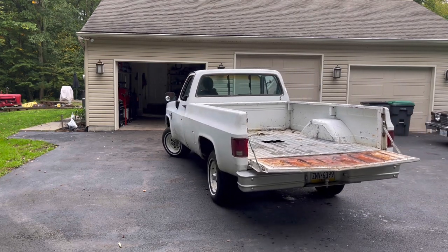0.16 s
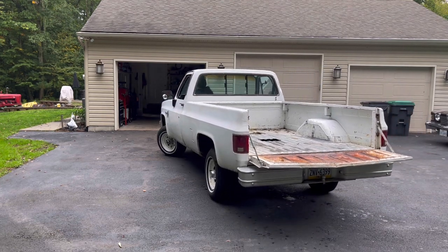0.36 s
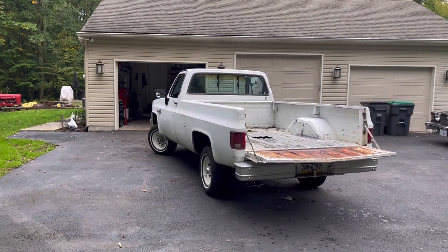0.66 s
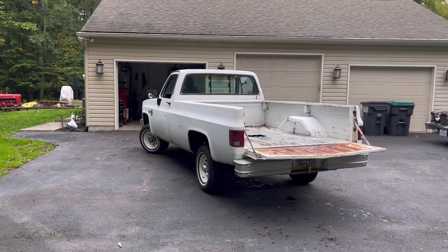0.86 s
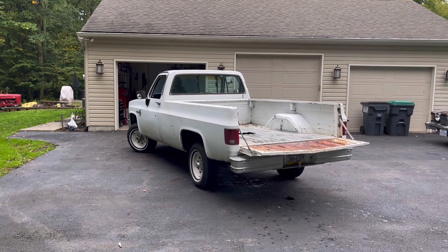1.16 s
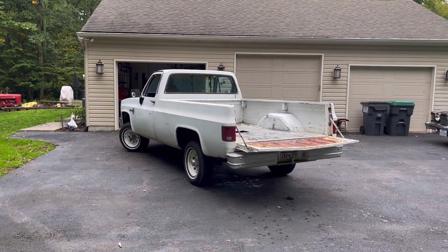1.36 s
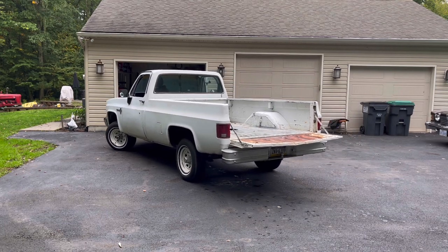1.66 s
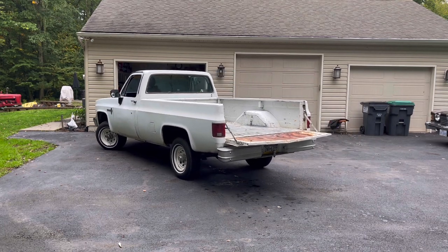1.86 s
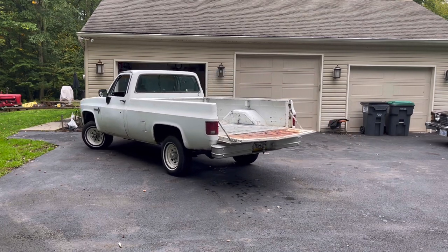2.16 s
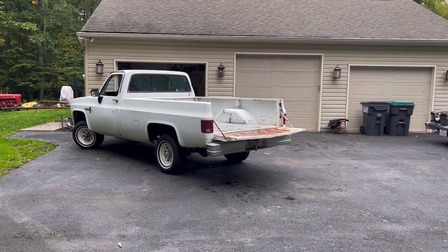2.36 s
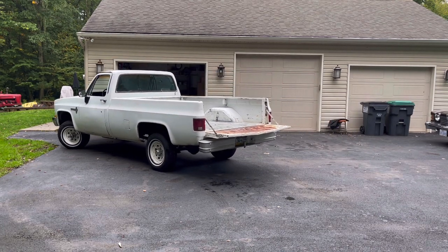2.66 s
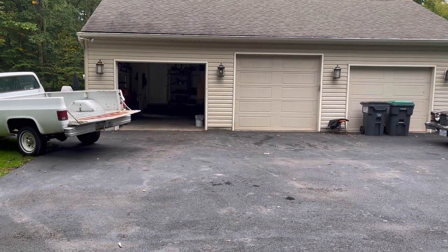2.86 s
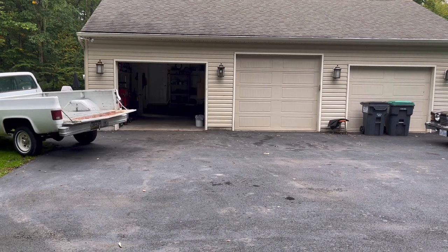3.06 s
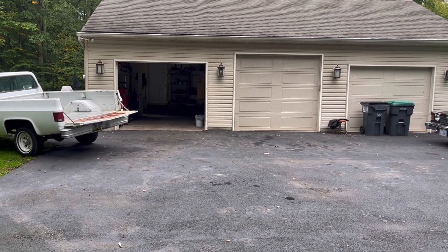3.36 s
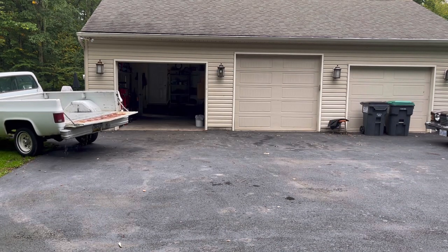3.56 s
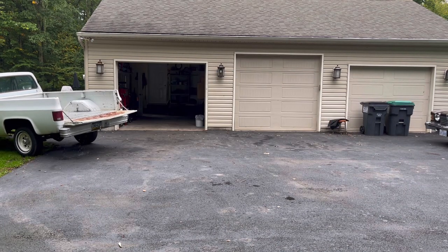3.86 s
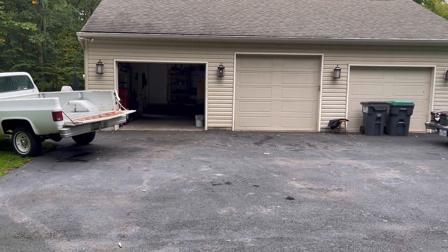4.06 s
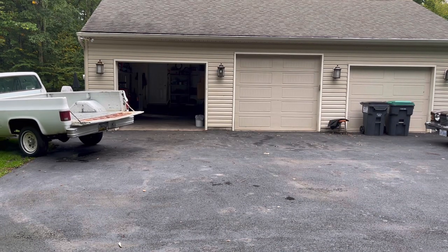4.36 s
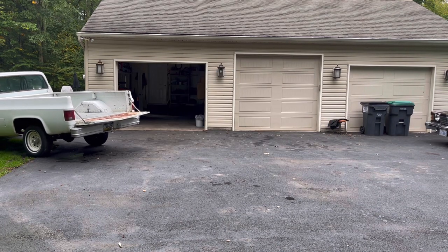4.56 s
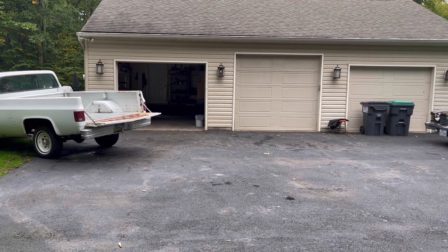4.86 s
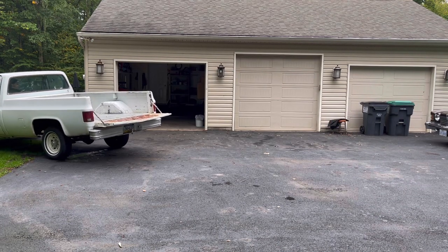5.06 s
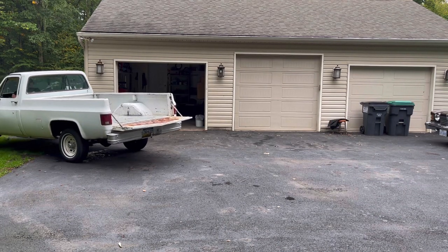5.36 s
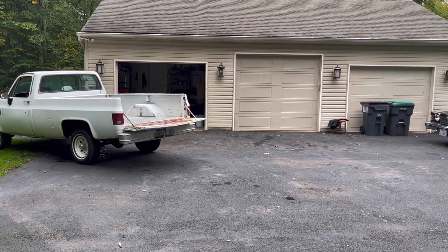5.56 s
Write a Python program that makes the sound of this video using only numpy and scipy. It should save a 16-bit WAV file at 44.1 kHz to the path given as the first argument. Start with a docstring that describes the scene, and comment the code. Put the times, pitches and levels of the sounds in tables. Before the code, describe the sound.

Deep exhaust chugging and chirping tyres on asphalt, an uneven faltering middle stretch, then a sudden louder, quicker engine drone with rubber squeaks and clunks.

```python
"""An old six-cylinder pickup manoeuvres on a sealed driveway, in three stretches joined abruptly.
First the exhaust throbs as firing pulses ring pipe and shell, tyres scrub, insects hiss faintly, and
stick-slip squeals return from ground and wall. Then weakened firings, short squeaks, a loose knock and
cracking grit are heard. Last the engine fires faster with louder squeaks, and slows past more knocks,
a brief bright hiss and two snaps of grit."""
import sys
import numpy as np
from scipy import signal
from scipy.fft import rfft, irfft
from scipy.io import wavfile
from scipy.ndimage import uniform_filter1d

SR = 44100
rng = np.random.default_rng(int(sys.argv[2]) if len(sys.argv) > 2 else 0)


def boost(x):
    """Linear amplitude factor 10**(x/20) for a level x in decibels (scalar or array-like)."""
    u = np.asarray(x, float) / 20
    return 10 ** u


def waveform_to_disk(signal):
    """Save audio, clipped to [-1, 1], as 16-bit WAV at the path in sys.argv[1]."""
    frames = np.transpose(np.atleast_2d(signal))
    scaled = np.clip(frames, -1, 1) * 32767
    samples = np.round(scaled).astype(np.int16)
    wavfile.write(sys.argv[1], SR, samples)


N = 251370

# the three stretches: (start [s], end [s])
STRETCHES = [(0, 2.7), (2.7, 4.073), (4.073, 5.7)]
# engine loudness as heard, one table a stretch, with a brief drop after the loud squeak of the third:
# (time [s], exhaust level [dB], body shake level [dB])
ENGINE_LOUDNESS = [
    [(0, -29, -29), (.08, -29.5, -32), (.18, -23.5, -21), (.9, -24, -22.5), (1.35, -23, -20.5),
     (1.7, -26.5, -23), (2.27, -23, -21), (2.5, -26.5, -20), (2.7, -26, -21.5)],
    [(2.7, -24, -27), (3.75, -25, -28), (3.83, -24, -27.5), (4.07, -22.5, -31)],
    [(4.076, -13, -33), (4.264, -14, -29), (4.36, -22, -38), (4.436, -21, -28), (4.522, -15.5, -24),
     (4.808, -13.5, -30), (5.034, -14, -16), (5.07, -17, -27), (5.19, -17.5, -23), (5.29, -24.5, -16),
     (5.6, -22.5, -19.5), (5.7, -27.5, -20)],
]
# how far left the pickup is heard, one value a stretch: (scale factor of the left-right level difference)
LEFTWARD = [0.19, 0.64, 0.55]


def evened(x):
    """Normalises the mean power: scales to rms 1."""
    return x / np.sqrt(np.mean(x ** 2) + 1e-20)


def read(points, hz):
    """Interpolates a spectrum on a logarithmic frequency axis."""
    f, value = np.transpose(points)
    return np.interp(np.log(hz + 1), np.log(f + 1), value)


def columns(rows, t):
    """Interpolates each column of a time table linearly."""
    s, *rest = np.transpose(rows)
    return [np.interp(t, s, c) for c in rest]


def by_stretch(values, t):
    """Piecewise-constant function of time: one value for each stretch."""
    return np.asarray(values)[np.searchsorted([a for a, b in STRETCHES[1:]], t)]


def drift(length):
    """Low-pass random process: white noise twice averaged over length samples, at rms 1."""
    return evened(uniform_filter1d(uniform_filter1d(rng.standard_normal(N), length), length))


def bursts(rows, rise, fall, t):
    """Power sum of envelopes that climb, hold and decay exponentially (slopes in dB per s)."""
    power = 0
    for s, hold, peak_db in rows:
        before_db = np.maximum(rise * (s - t), 0)
        after_db = np.maximum(fall * (t - s - hold), 0)
        power = power + boost(2 * (peak_db - before_db - after_db))
    return np.sqrt(power)


def noise(spectra, level_db, patchy_db, flicker_db):
    """Partially coherent noise at two microphone ports, made from random short-time spectra."""
    # likeness of the two ports: (frequency [Hz], correlation [0-1])
    likeness = [(60, 1), (300, .98), (600, .9), (2000, .8), (4000, .88), (15000, .93)]
    # phase by which the left port leads: (frequency [Hz], lead [rad])
    phase_lead = [(0, 0), (780, 0.5), (1380, 0.5), (2760, 2.1), (3100, 1.7), (3790, -0.0), (6800, 0.3),
                  (7750, 1.0), (8870, -0.3), (9730, -2.7), (10900, -3.7), (11500, -6.3), (12600, -6.4),
                  (15200, -6.3)]
    # left-right level difference before scaling by LEFTWARD: (frequency [Hz], difference [dB])
    left_excess = [(60, 9), (150, 11), (380, 4.5), (950, 10), (2380, 14.5), (5980, 7.5), (15000, -7)]
    frames, hz = N // 128 + 5, np.fft.rfftfreq(512, 1 / SR)
    t = np.arange(frames) * 128 / SR
    a, b, c, d, patches = rng.standard_normal((frames, 257, 5)).T
    patches = evened(uniform_filter1d(uniform_filter1d(patches, 6, 0), 12, 1))  # over frequency, then time
    flicker = evened(uniform_filter1d(rng.standard_normal(frames), 3))  # all frequencies together
    same = np.clip(read(likeness, hz), -1, 1)[:, None]
    left = a + 1j * b
    right = same * left + np.sqrt(1 - same ** 2) * (c + 1j * d)
    right = right * np.exp(-1j * read(phase_lead, hz))[:, None]
    lean_db = read(left_excess, hz)[:, None] * by_stretch(LEFTWARD, t) / 2
    z = np.array([left * boost(lean_db), right * boost(-lean_db)])
    colours = np.array([boost(read(points, hz)) for points in spectra])
    colours /= np.linalg.norm(colours, axis=1, keepdims=True)
    z *= by_stretch(colours, t - 256 / SR).T * boost(patchy_db * patches + flicker_db * flicker)
    return boost(level_db) * evened(signal.istft(z, nperseg=512, noverlap=384)[1][:, :N])


def shell(modes):
    """Modal impulse response of the muffler shell: damped sines, each with its own rise time."""
    t = np.arange(6000) / SR
    ring = np.zeros(len(t))
    for hz, width, db, rise in modes:
        envelope = (1 - np.exp(-(t / rise) ** 2)) * np.exp(-np.pi * width * t)
        ring += boost(db) * envelope * np.sin(2 * np.pi * hz * t)
    return ring


def response(points, lag, size=16384):
    """Centred pulse by the Hilbert gain-phase relation: lag 1 is minimum phase, lag 0 symmetric."""
    log_gain = signal.hilbert(np.log(boost(read(points, abs(np.fft.fftfreq(size, 1 / SR))))))
    return np.fft.fftshift(np.fft.ifft(np.exp(log_gain.real - 1j * lag * log_gain.imag)).real)


def exhaust():
    """Source-filter principle: a train of negative pressure pulses, one a firing, rings pipe and shell."""
    # firing rate in each stretch: (time [s], rate [firings per s])
    first_rates, second_rates, third_rates = [(0.0, 24.2), (0.14, 25.9), (0.32, 34.2), (0.41, 33.1),
                                              (0.65, 29.0), (0.82, 27.4), (1.05, 33.7), (1.3, 38.2),
                                              (1.71, 34.8), (2.2, 38.5), (2.55, 34.7), (2.7, 35.6)], [(2.7, 38.2), (2.874, 40.2), (3.508, 40.9),
                                                              (3.902, 42.7), (4.07, 42.0)], [(4.076, 80.2), (5.012, 80.2),
                                                                               (5.148, 78.3), (5.27, 73.2),
                                                                               (5.374, 71.2), (5.58, 69.7),
                                                                               (5.7, 63.2)]
    # strength of each cylinder in firing order: (level [dB])
    cylinder_levels = [.5, -.5, 0, .4, -.6, .2]
    # random spread of firing strength, one value a stretch: (spread [dB])
    strength_spread = [.7, .6, .4]
    # random spread of firing time, one value a stretch: (spread [share of the gap between firings])
    timing_spread = [.012, .01, .008]
    # brief weakening of the firings: (middle [s], level change [dB], half length [s])
    misfires = [(2.778, -13, .022), (2.872, -8, .014), (3.07, -4, .02), (3.18, -7, .02), (3.47, -8, .028),
                (3.755, -13, .016), (3.78, -4, .012), (5.285, -9, .018), (5.43, -4, .015), (5.575, -5, .02)]
    # how each cylinder shakes the shell, hardest once a turn: (relative kick)
    shell_kicks = [1.0, .3, .12, .85, .25, .15]
    # shell modes from behind, then from the side: (frequency [Hz], width [Hz], level [dB], rise [s])
    shell_modes = [
        [(179.2, 12.7, -1, 0.0014), (210.5, 8.4, 2.5, 0.036), (240.3, 12.2, 1, 0.0096), (275, 33, -4, 0.027),
         (333, 12.3, -12, 0.0045), (395, 20, -16.5, 0.0055)],
        [(184, 11, -2.5, 0.0045), (266.2, 21, 6.5, 0.016), (321, 31, -4, 0.0018), (395.3, 16.3, -4, 0.013),
         (478.6, 6.2, -18.5, 0.0079), (591, 20, -19, 0.01)],
    ]
    # pipe spectrum heard from behind, and from the side: (frequency [Hz], level [dB])
    pipe_behind, pipe_beside = [(3, -63), (20, -27), (37, -13), (48, 2), (57, -9), (67, 1), (86, 1),
                                (112, -2), (148, -13.5), (172, -11), (200, -24.5), (300, -45), (600, -85)], [(3, -70), (30, -36), (55, -14), (78, 0), (110, -9),
                                                (140, -5), (162, -12), (190, -14), (215, -11), (240, -30),
                                                (275, -22), (400, -33), (700, -45), (1500, -80)]
    out = np.zeros(N)
    for k, ((a, b), rows) in enumerate(zip(STRETCHES, [first_rates, second_rates, third_rates])):
        # from behind in the first two stretches, from the side in the third
        pipe, modes = [pipe_behind, pipe_beside][k // 2], shell_modes[k // 2]
        t = np.arange(a - .2, b, 1 / SR)  # already running before the stretch begins
        (rate,), (level_db, shake_db) = columns(rows, t), columns(ENGINE_LOUDNESS[k], t)
        at = np.flatnonzero(np.diff(np.floor(np.cumsum(rate) / SR)))
        chance = rng.standard_normal((200, 3))[:len(at)]
        late = np.round(timing_spread[k] * chance[:, 0] * SR / rate[at]).astype(int)
        at = np.clip(at + late, 0, len(t) - 1)
        strength_db = level_db[at] + np.resize(cylinder_levels, len(at)) + strength_spread[k] * chance[:, 1]
        for s, loss_db, half in misfires:
            strength_db += loss_db * np.exp(-((t[at] - s) / half) ** 4)
        orders = np.arange(1, 13)[:, None] * rate[at]
        steady = rate[at] / SR * np.sqrt(2 * np.sum(boost(2 * read(pipe, orders)), 0))  # rms of an even train
        train, kicks = np.zeros((2, len(t)))
        train[at] = -boost(strength_db) / steady
        kicks[at] = boost(shake_db[at]) * (np.resize(shell_kicks, len(at)) + .1 * chance[:, 2])
        sound = signal.oaconvolve(train, response(pipe, .35), "same")
        sound += signal.oaconvolve(kicks, shell(modes))[:len(t)]
        start, end = round(a * SR), min(round(b * SR), N)
        out[start:end] = sound[start - end:]
    # the level dips to zero for a few milliseconds where the second stretch begins
    out *= 1 - np.exp(-((np.arange(N) / SR - STRETCHES[1][0]) / .002) ** 2)
    return out * boost([[.5], [-.5]])


def tyres_rolling():
    """Broadband friction noise: bright scrub on asphalt over a rumble that follows scrub and body shake."""
    # weight on the turning tyres, one table a stretch: (time [s], scrub level [dB])
    rolling = [
        [(0, -39), (.8, -37.5), (.95, -43), (1.6, -41.5), (2.19, -40.5), (2.4, -48), (2.69, -45.5)],
        [(2.705, -51.5), (3.1, -48.5), (3.2, -53), (4.072, -54)],
        [(4.074, -25), (4.254, -25.5), (4.366, -38), (5.2, -37.5), (5.3, -40), (5.7, -40)],
    ]
    # moments when the tread scuffs harder: (start of hold [s], hold [s], level [dB])
    scuffs = [(2.794, 0.16, -41), (3.706, .03, -51), (4.567, 0.018, -28), (4.721, 0.013, -28),
              (4.829, 0.014, -24), (4.932, 0.021, -24), (5.016, 0.043, -24.5), (5.145, 0.019, -25.5),
              (5.35, 0.019, -34.5), (5.4, 0.024, -33)]
    # scrub colour, one table a stretch: (frequency [Hz], relative density [dB])
    scrub_spectra = [
        [(350, -59), (600, -4.5), (894, -1.5), (2320, -6.5), (3680, -10.5), (4240, -15), (4760, -16),
         (8840, -16), (11900, -26), (13000, -100)],
        [(350, -41), (600, -13), (648, -19), (786, -20), (1070, -18.5), (1990, -24.5), (3240, -22), (3590, -22),
         (9670, -29), (13000, -50)],
        [(350, -44), (600, 0.5), (632, -6), (1330, -1), (1500, -4.5), (6740, -14), (9670, -17.5), (10200, -20),
         (10600, -16.5), (11100, -21.5), (13000, -43)],
    ]
    # rumble colour: (frequency [Hz], relative density [dB])
    rumble_spectrum = [(150, 3.5), (260, 2), (400, 2), (600, -6.5), (900, -11.5), (1500, -24), (2500, -29),
                       (4000, -50)]
    # mean rumble, one value a stretch: (level [dB])
    rumble_levels = [-40, -41.5, -28.5]
    with_scrub, with_shake = 0.25, 0.43  # dB of rumble per dB of scrub and of body shake
    t = np.arange(N) / SR

    def swing(db):
        """Deviation of a level from its mean in each stretch."""
        return db - by_stretch([db[round(a * SR):round(b * SR)].mean() for a, b in STRETCHES], t)

    steady_scrub = boost(columns(sum(rolling, []), t)[0])
    scrub_db = 20 * np.log10(np.hypot(steady_scrub, bursts(scuffs, 250, 250, t)))
    shake_db = columns(sum(ENGINE_LOUDNESS, []), t)[1]
    rumble_db = by_stretch(rumble_levels, t) + with_scrub * swing(scrub_db) + with_shake * swing(shake_db)
    scrub = noise(scrub_spectra, scrub_db, 0.78, 1.71)
    return scrub + noise([rumble_spectrum] * 3, rumble_db, 0.53, 0.24)


def insects():
    """Narrow-band noise: a faint hiss, mostly in opposite phase at the two ports."""
    # hiss, one value a stretch: (level [dB])
    insect_levels = [-51.5, -57.5, -61]
    centre_hz, width_hz = 8980, 1400
    hz = np.fft.rfftfreq(N, 1 / SR)
    band = np.exp(-((hz - centre_hz) / width_hz) ** 2)
    near, wide = irfft(rfft(rng.standard_normal((2, N))) * band, N)
    pair = np.array([near + .5 * wide, -.6 * near + .5 * wide])
    return evened(pair) * boost(by_stretch(insect_levels, np.arange(N) / SR))


def squeak(start, hold, peak_db, hz, harsh_db):
    """Stick-slip transient: rubber catches sharp, settles, glides upward and lets go."""
    catch_s, let_go_db_per_s, silent_db = .012, 700, -29.5  # rise time, fall after the hold, ends under the peak
    sharp_share, settle_s, glide_hz_per_s = 0.029, 0.0065, 310
    t = np.arange(-catch_s, hold - silent_db / let_go_db_per_s, 1 / SR)
    level_db = peak_db + silent_db * np.maximum(-t / catch_s, 0)
    level_db = level_db - let_go_db_per_s * np.maximum(t - hold, 0)
    pitch = hz * (1 + sharp_share * np.exp(-(t + catch_s) / settle_s)) + glide_hz_per_s * (t - hold / 2)
    return round((start - catch_s) * SR) + np.arange(len(t)), pitch, level_db, harsh_db


def squeal(at, hz, level_db, harsh_db, wobble, fuzz_db):
    """Stick-slip oscillation: a periodic tone of wavering pitch with harmonic overtones."""
    # third and fourth partial: (level relative to the octave [dB])
    overtone_levels = [-14, -15.5]
    loose = 1 + np.clip((-39 - level_db) / 4, 0, 1.5)  # a weak squeal holds its pitch less well
    angle = 2 * np.pi * np.cumsum(hz * (1 + loose * wobble[at])) / SR
    upper = np.sin(2 * angle)
    for k, db in enumerate(overtone_levels):
        upper = upper + boost(db) * np.sin((k + 3) * angle)
    tone = boost(level_db) * (np.sin(angle) + boost(harsh_db) * upper)
    return tone * np.sqrt(2) * boost(fuzz_db[at]) * signal.windows.tukey(len(at), .1)


def tyres_squealing():
    """Stick-slip squeals of two tyres and short squeaks, with discrete reflections from ground and wall."""
    # two long squeals: (time [s], frequency [Hz], level [dB], harshness as octave over fundamental [dB])
    first_squeal, second_squeal = [(0.2, 900, -45.5, -14), (0.33, 900, -41.5, -9), (0.39, 1062, -41.5, -6),
                                   (0.43, 1182, -36.5, -11), (0.514, 1245, -34.5, -12),
                                   (0.654, 1200, -31.5, -4.5), (0.834, 1205, -32.5, -8),
                                   (0.9, 1070, -39.5, -12), (1.0, 1105, -51, -6)], [(1.16, 1086, -51, 3), (1.221, 1009, -46.5, 4),
                                                     (1.262, 972.5, -38, -2.5), (1.29, 1191, -40, 1),
                                                     (1.316, 1250, -30, -14), (1.376, 1285, -55, 4),
                                                     (1.399, 1163, -45, -10), (1.52, 1169, -42, -2),
                                                     (1.559, 1290, -39, -1), (1.603, 1106, -40, -1),
                                                     (1.726, 1119, -35, -6.5), (1.798, 1270, -35.5, -11.5),
                                                     (1.82, 1000, -44, -2.5), (1.938, 964.5, -44.5, -7),
                                                     (2.02, 1039, -47.5, -7), (2.17, 1130, -39, -1.5),
                                                     (2.204, 1249, -44, -12.5), (2.36, 1170, -49, -10),
                                                     (2.412, 1218, -36, 0), (2.467, 1264, -38, -17.5),
                                                     (2.65, 1207, -66, 2)]
    # amplitude modulation of each long squeal: (depth [0-1])
    throb_depths = [0.77, .2]
    # squeaks: (start of hold [s], hold [s], level [dB], frequency [Hz], harshness [dB])
    squeaks = [(0.043, 0.058, -43, 1178, -7), (0.109, 0.023, -45, 1575, -5),
               (2.93, 0.029, -32.5, 1380, -14), (3.007, 0.017, -42, 1378, -16),
               (4.26, 0.072, -15, 1243, -14.5), (4.36, 0.13, -48.5, 1214, 3), (4.374, .012, -40, 1395, -35),
               (4.403, 0.034, -34, 1383, -22), (4.486, 0.05, -38.5, 1253, -13),
               (4.547, 0.018, -17.5, 1157, -30), (4.57, .03, -27, 1230, -15),
               (4.801, 0.025, -22, 1353, -14), (4.854, 0.025, -40, 1290, -18),
               (4.916, 0.0091, -20.5, 1295, -19), (4.98, .012, -31.5, 1304, -14),
               (5.023, 0.032, -14, 1228, -24.5), (5.08, 0.03, -21, 1220, -22),
               (5.135, 0.033, -18, 1257, -22), (5.189, 0.016, -28, 1250, -24),
               (5.259, 0.026, -41, 1250, -20)]
    # echoes: (delay [s], left level [dB], right level [dB])
    echoes = [(.004, -18, -6), (.011, -5.5, -11.5), (.062, -14, -13.5)]
    throb_hz, rasp_db = 54.96, -4  # rasp: a second tyre, rougher than the first
    direct = np.zeros(N)
    wander, flutter = drift(90), drift(160)
    # tread blocks let go in turn
    throb = np.sin(2 * np.pi * np.cumsum(throb_hz * (1 + 0.14 * drift(900))) / SR)
    for k, rows in enumerate([first_squeal, second_squeal]):
        at = np.arange(round(rows[0][0] * SR), round(rows[-1][0] * SR))
        hz, level_db, harsh_db = columns(rows, at / SR)
        clear = squeal(at, hz, level_db, harsh_db, .02 * wander, 2.0 * flutter + 2.5 * drift(900))
        rough_wobble = .05 * drift(70) + .03 * drift(900)
        rasp = squeal(at, hz, level_db + rasp_db, harsh_db, rough_wobble, 4.5 * drift(500))
        direct[at] += (clear + rasp) * (1 + np.clip(throb_depths[k], 0, 1) * throb[at])
    for row in squeaks:
        at, *voice = squeak(*row)
        direct[at] += squeal(at, *voice, 0.023 * wander, 0.5 * flutter)
    lean_db = 5.4 * by_stretch(LEFTWARD, np.arange(N) / SR)
    out = np.array([direct * boost(lean_db), np.roll(direct, 3) * boost(-lean_db)])  # right port 3 samples later
    for s, left_db, right_db in echoes:
        # at the right port the echo is inverted and a tenth later
        pair = np.array([np.roll(direct, round(s * SR)), -np.roll(direct, round(1.1 * s * SR))])
        out += boost([[left_db], [right_db]]) * pair
    return out


def knocks():
    """Impact excitation: something loose in the load bed bumps, ringing two heavily damped partials."""
    # bumps: (time [s], level [dB], upper partial [Hz])
    bumps = [(2.778, -24, 660), (2.886, -19.5, 610), (4.996, -9, 1210), (5.393, -29, 493),
             (5.399, -12, 497)]
    out, u = np.zeros(N), np.arange(700) / SR
    envelope = np.exp(-u / 0.00061) * (1 - np.exp(-(u / 0.00018) ** 2))
    for s, db, hz in bumps:
        ring = np.sin(2 * np.pi * hz * u) + 1.2 * np.sin(2 * np.pi * 0.46 * hz * u)
        out[round(s * SR):][:700] += boost(db) * ring * envelope
    return out * boost([[1.5], [-1.5]])


def grit():
    """Random impulse process: grains crack in clumps under a tyre, a few snap louder, through one band."""
    # clumps of grains: (start of hold [s], hold [s], level [dB])
    clumps = [(3.655, 0.11, -42.5), (3.8, 0.046, -46), (3.9, 0.011, -47), (3.975, .012, -53)]
    # single snaps: (time [s], level [dB])
    snaps = [(3.638, -44), (3.6617, -32), (3.712, -27.5), (3.732, -40), (5.466, -31.5), (5.5383, -32)]
    t = np.arange(N) / SR
    strength = boost(3.5 * np.minimum(rng.exponential(1, N), 4))
    clicks = strength * (rng.random(N) < 1500 / SR) * rng.choice([-1, 1], N)  # 1500 grains per s on average
    clicks = evened(clicks) * bursts(clumps, 490, 155, t) * boost(0.85 * drift(200))
    u = np.arange(120) / SR
    band = signal.butter(4, [2800, 9500], "bandpass", fs=SR)
    crack = evened(signal.lfilter(*band, u == 0)) / np.sqrt(len(u))  # unit energy
    for s, db in snaps:
        clicks[round(s * SR):][:120] += boost(db) * rng.standard_normal(120) * np.exp(-u / 0.0022)
    return signal.oaconvolve(clicks, crack)[:N] * boost([[1.5], [-1.5]])


def bright_hiss():
    """Gated band noise: a brief hiss in one bright band."""
    # when it sounds: (middle [s], half length [s])
    moment = [5.345, .028]
    # its band: (centre [Hz], width [Hz])
    hiss_band = [5300, 700]
    (s, half), (centre_hz, width) = moment, hiss_band
    hz = np.fft.rfftfreq(N, 1 / SR)
    band = irfft(rfft(rng.standard_normal(N)) * np.exp(-((hz - centre_hz) / width) ** 2), N)
    envelope = np.exp(-((np.arange(N) / SR - s) / half) ** 4)
    return evened(band) * boost(-39.5) * envelope * boost([[2], [-2]])


def scene():
    """Linear superposition of all sources at the two microphone ports."""
    engine_and_road = exhaust() + tyres_rolling()
    return engine_and_road + insects() + tyres_squealing() + knocks() + grit() + bright_hiss()


def top_cut(x):
    """Nothing passes above the cut-off."""
    return signal.sosfilt(signal.butter(12, 15620, fs=SR, output="sos"), x)


def record(dry):
    """Linear zero-phase filtering colours the treble of the mix."""
    # a gap near 10 kHz, a peak, then a steep fall: (frequency [Hz], gain [dB])
    treble = [(9600, 0), (10000, -7), (10350, -10), (10700, 6.5), (11700, -0.5), (12600, -30), (15600, -36)]
    gain = boost(read(treble, np.fft.rfftfreq(N, 1 / SR)))
    coloured = irfft(rfft(dry) * gain, N)
    return top_cut(coloured)


dry = scene()
out = record(dry)
waveform_to_disk(out)
```